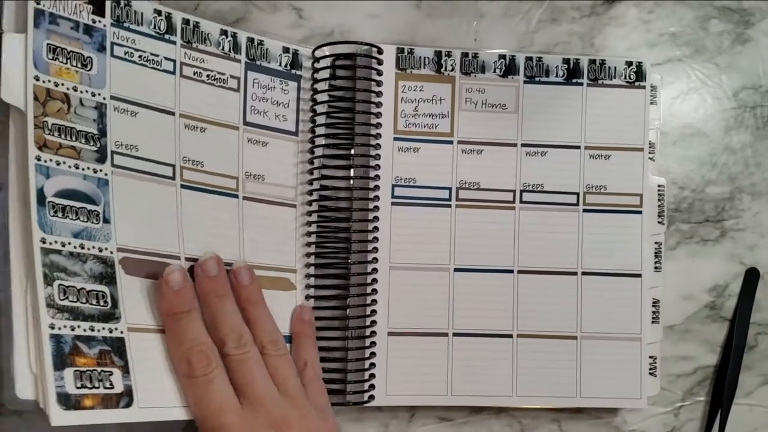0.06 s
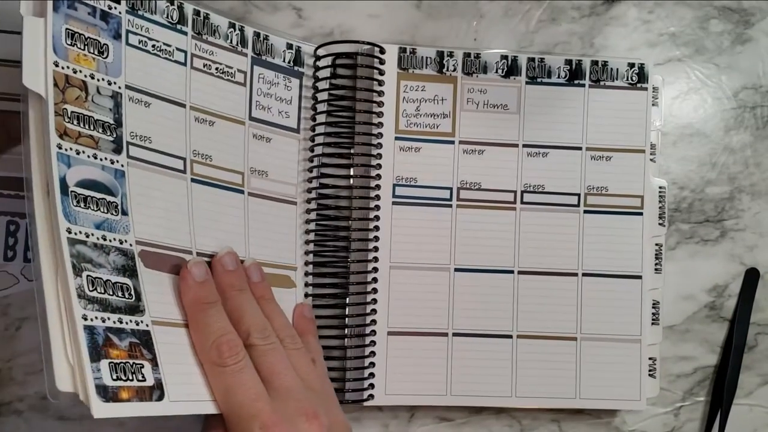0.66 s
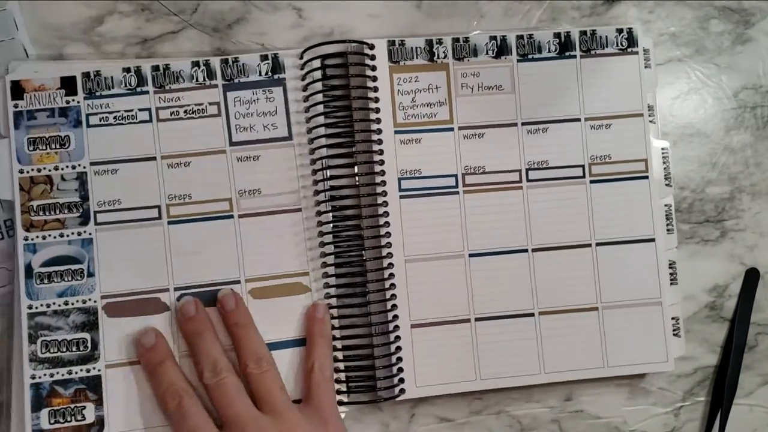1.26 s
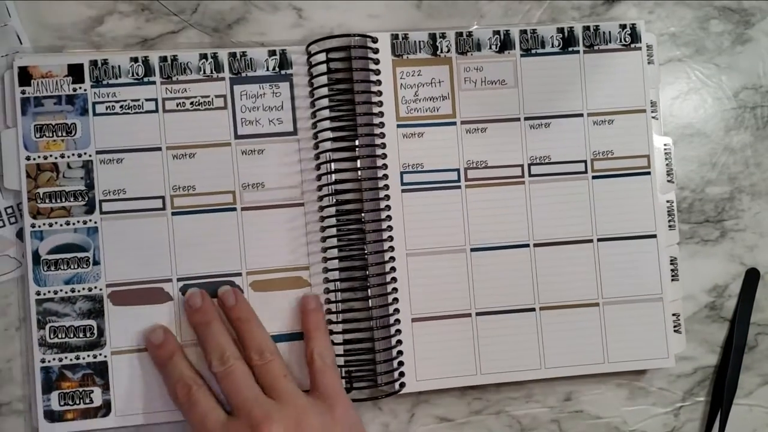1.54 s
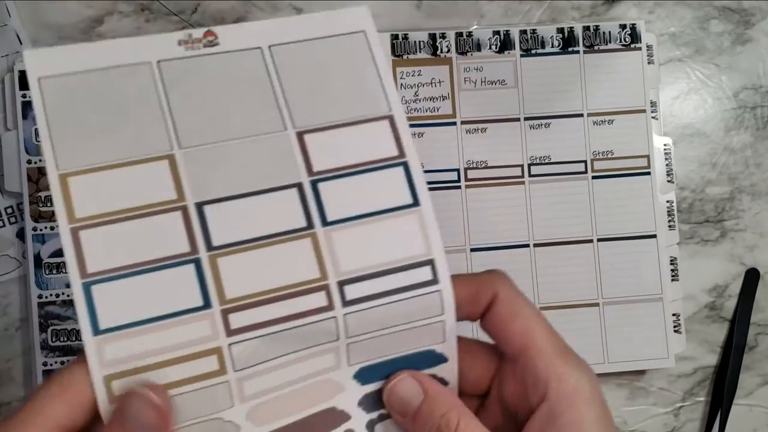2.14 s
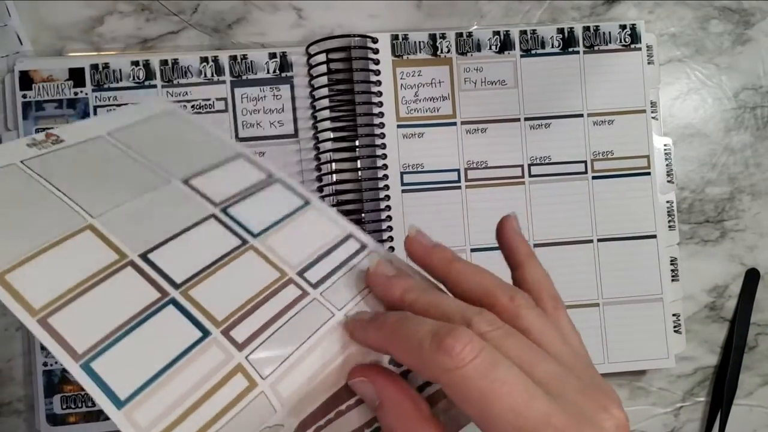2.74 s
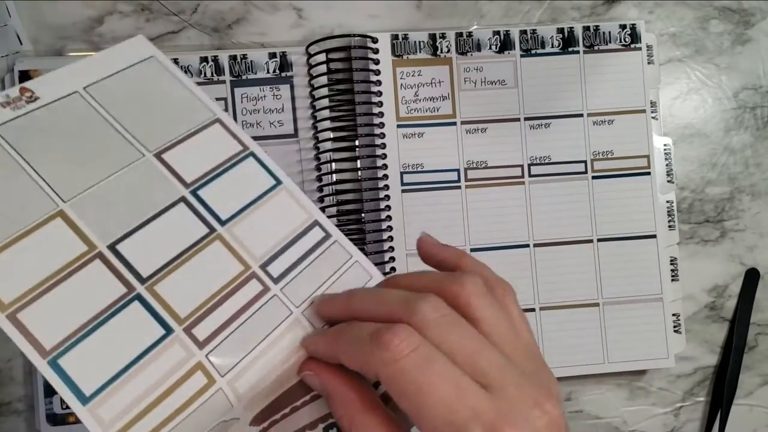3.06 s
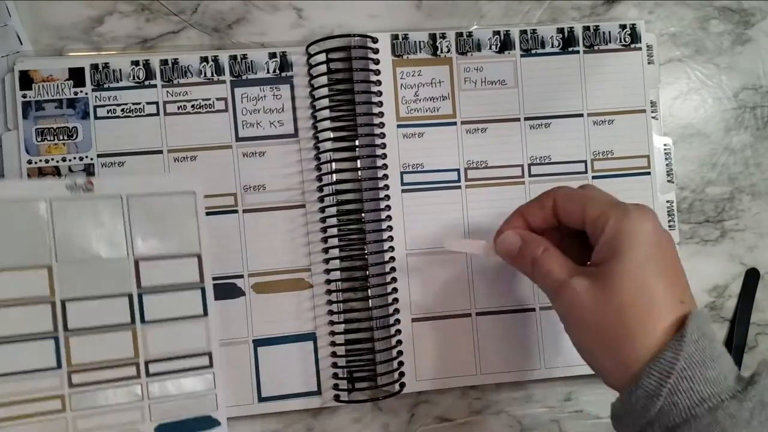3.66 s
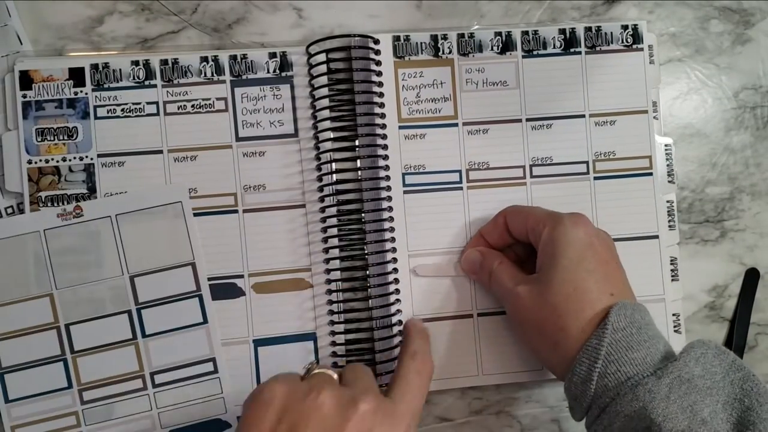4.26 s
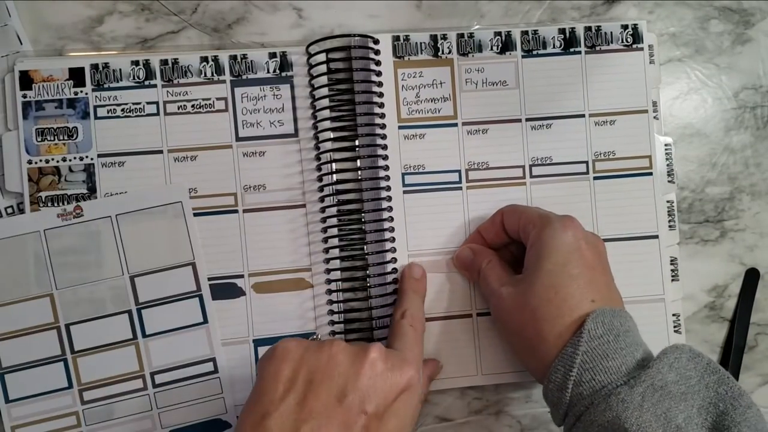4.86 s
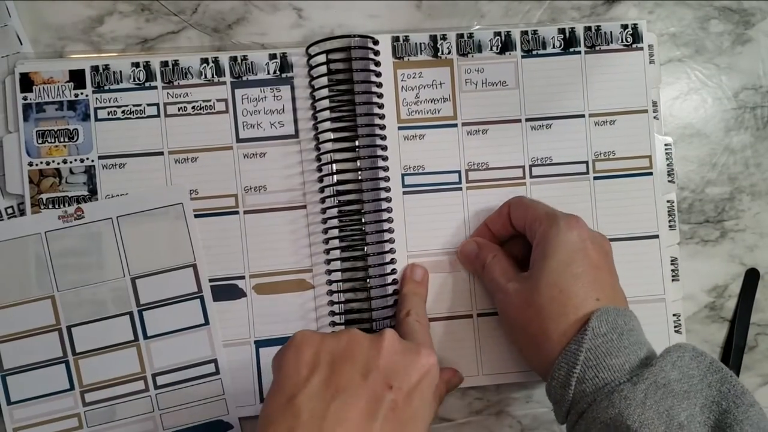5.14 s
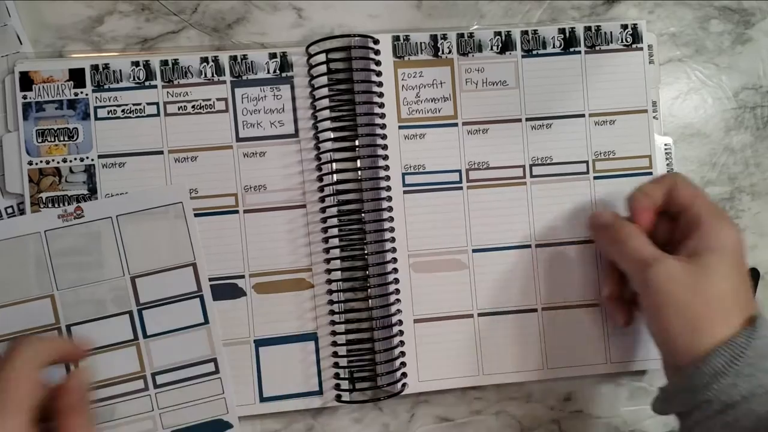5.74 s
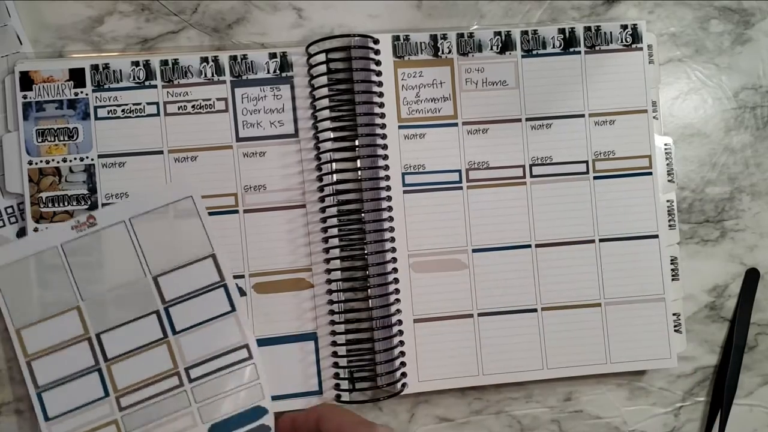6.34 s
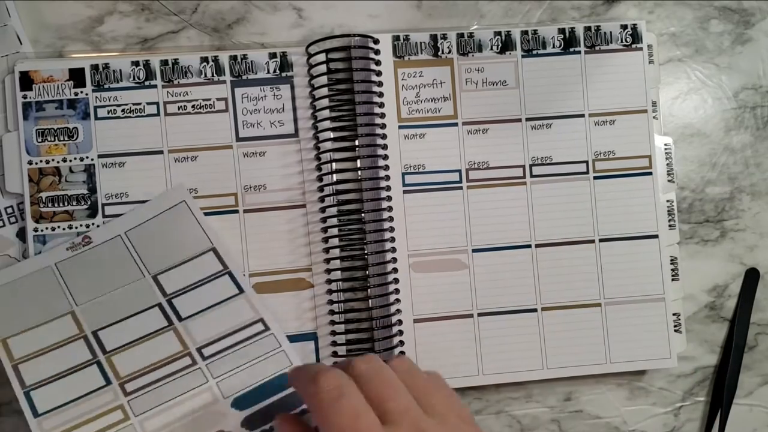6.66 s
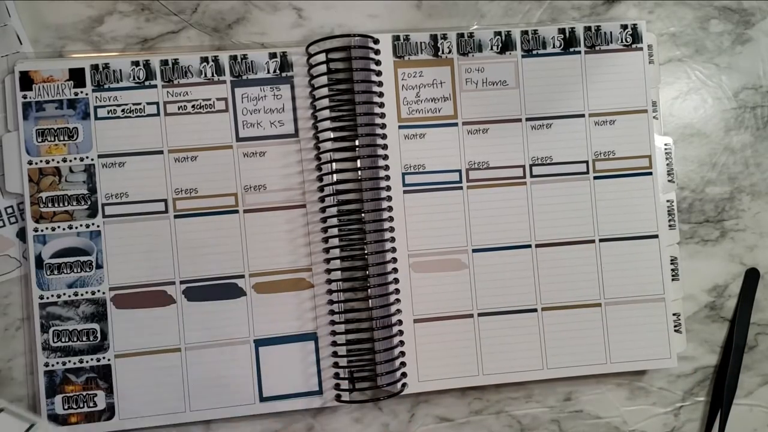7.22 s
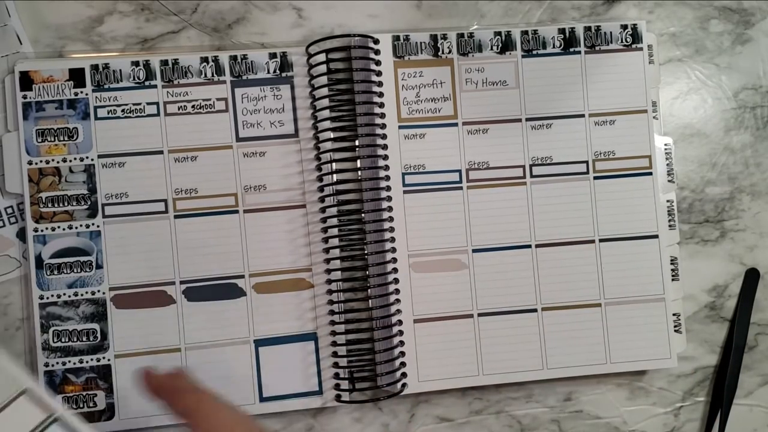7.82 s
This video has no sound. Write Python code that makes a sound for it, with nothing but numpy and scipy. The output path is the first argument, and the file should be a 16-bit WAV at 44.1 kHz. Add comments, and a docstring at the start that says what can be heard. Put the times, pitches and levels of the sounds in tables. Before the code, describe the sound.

A hand smooths a page and handles a sticker sheet, with light knocks, dry peeling crackles and a steady hum.

```python
"""Sticker sheets over a planner

A hand smooths a page and lets it flop; a sheet is lifted and knocked against the book, a sticker is
peeled off and placed, and the sheet slides away. Paper hisses in tiny slips, creases snap, glue crackles,
book and desk ring. A fan drones in the small room. The left microphone port faces the paper, the right
is shaded."""
import sys
import numpy as np
from scipy import signal
from scipy.fft import rfft, irfft, next_fast_len
from scipy.io import wavfile
from scipy.ndimage import map_coordinates

SR = 44100
rng = np.random.default_rng(int(sys.argv[2]) if len(sys.argv) > 2 else 0)


def store_wav(level_fs):
    """Save 16-bit WAV to argv[1]."""
    pcm = np.round(np.clip(np.atleast_2d(level_fs), -1, 1) * 32767)
    wavfile.write(sys.argv[1], SR, pcm.T.astype(np.int16))


N = 352359
TOP_HZ = 15780


def amp(db):
    """Decibels to gain."""
    return 10 ** (np.asarray(db) / 20)


def unit(x):
    """x at rms 1."""
    return x / np.sqrt(np.mean(x ** 2) + 1e-20)


def at_peak(x, db):
    """x scaled to a peak level."""
    return amp(db) * x / np.abs(x).max()


def along(points, hz):
    """(freq_hz, value) points read on a log axis."""
    freqs, values = np.transpose(points)
    return np.interp(np.log(hz + 1), np.log(freqs + 1), values)


def humps(peaks, hz):
    """Summed gain of (centre_hz, width_hz, level_db) resonances."""
    return sum(amp(db) / (1 + ((hz - centre) / (width / 2)) ** 2) for centre, width, db in peaks)


def wobble(rate_hz):
    """Smooth random curve."""
    knots = rng.standard_normal(int(N * rate_hz / SR) + 4)
    return map_coordinates(knots, [np.arange(N) * rate_hz / SR])


def filtered(x, response):
    """x through a gain that depends on frequency."""
    n = x.shape[-1]
    size = next_fast_len(n + 8192)
    return irfft(rfft(x, size) * response(np.fft.rfftfreq(size, 1 / SR)), size)[..., :n]


def coloured(x, spectrum):
    """x shaped by (freq_hz, level_db) points, rms 1."""
    return unit(filtered(x, lambda hz: amp(along(spectrum, hz))))


def ports(pan_db):
    """Constant-power gains for a left-minus-right level."""
    pair = np.array([amp(pan_db / 2), amp(-pan_db / 2)])
    return pair / np.sqrt(np.mean(pair ** 2, axis=0))


def add(track, start_s, sound):
    """Mix a sound into the track."""
    part = track[..., max(round(start_s * SR), 0):][..., :sound.shape[-1]]
    part += sound[..., :part.shape[-1]]


def noise_burst(t, t60_s):
    """Decaying white noise."""
    return rng.standard_normal(len(t)) * amp(-60 * t / t60_s)


def ring(modes, attack_s):
    """Damped modes, pitch and strength varied a little per blow, peak 1."""
    t = np.arange(SR // 2) / SR
    struck = [(hz * rng.normal(1, .015), db + rng.normal(0, 1.5), t60) for hz, db, t60 in modes]
    tone = sum(amp(db - 60 * t / t60) * np.sin(2 * np.pi * hz * t) for hz, db, t60 in struck)
    return at_peak(tone * (1 - np.exp(-t / attack_s)), 0)


def grains(rate_hz, spread_db):
    """Fibres catch and slip: tiny impulses of very unequal size, rms 1."""
    size = amp(spread_db * np.clip(rng.standard_normal(N), -3, 2.5))
    return unit((rng.random(N) < rate_hz / SR) * size * rng.choice([-1, 1], N))


def motion(strokes, drop_db=19, roundness=1.36):
    """Strokes swell and fade: gain per sample and a power-weighted (time_s, resonance_hz) curve."""
    t = np.arange(0, N, 64) / SR
    peak_s, db, rise_s, fall_s, hz = np.transpose(strokes)[:, :, None]
    away = np.abs(t - peak_s) / np.where(t < peak_s, rise_s, fall_s)
    power = amp(db - drop_db * away ** roundness) ** 2 + 1e-20
    gain = np.interp(np.arange(N) / SR, t, np.sqrt(power.sum(axis=0)))
    resonance_hz = (power * hz).sum(axis=0) / power.sum(axis=0)
    return gain, np.column_stack([t, resonance_hz])


def swept(x, curve, boost_db, half_width_oct):
    """x through a resonance following a (time_s, resonance_hz) curve, at constant power."""
    hz, t, spectra = signal.stft(x, SR, nperseg=512)
    distance_oct = np.log2((hz[:, None] + 1) / np.interp(t, *np.transpose(curve)))
    gain = amp(boost_db * np.exp(-(distance_oct / half_width_oct) ** 2))
    power = np.mean(np.abs(spectra) ** 2, axis=1, keepdims=True)
    gain /= np.sqrt(np.sum(power * gain ** 2, axis=0))
    return unit(signal.istft(spectra * gain, SR, nperseg=512)[1][:N])


# room decay: freq_hz, t60_s
ROOM_DECAY = [(150, 1), (1000, 0.29), (4000, 0.21), (15000, 0.094)]


def in_room(x, near_db, walls_db, tail_db, near_t60_s=0.0064, walls_t60_s=0.11, gap_s=.006):
    """Direct sound, scatter off the desk, then close walls and the room's tail, at two ports."""
    hz, t, spectra = signal.stft(rng.standard_normal((2, SR // 4)), SR, nperseg=256)
    decay = amp(-60 * t / along(ROOM_DECAY, hz)[:, None])
    tail = signal.istft(spectra * decay, SR, nperseg=256)[1]
    t = np.arange(tail.shape[1]) / SR
    near = rng.standard_normal(tail.shape) * amp(-60 * t / near_t60_s)
    walls = rng.standard_normal(tail.shape) * amp(-60 * t / walls_t60_s) * (t > gap_s)
    parts = (near, near_db), (walls, walls_db), (tail * (t > gap_s), tail_db)
    response = sum(amp(db) * part / np.linalg.norm(part[0]) for part, db in parts)
    response[[0, 1], [0, 8]] += 1  # direct path: left leads by 8 samples
    return signal.fftconvolve(x[None], response / np.linalg.norm(response[0]), axes=1)


def close_by(x):
    """Reflections of a sharp sound just under the microphone."""
    return in_room(x, near_db=-6, walls_db=-1, tail_db=-4, near_t60_s=.016, walls_t60_s=.08, gap_s=.002)


def wandering(x, size=8192, smoothing=.7):
    """A moving sheet meets ever new reflections; its width smooths most of their ripple."""
    hop = size // 2
    out, padded = np.zeros((2, N + size + hop)), np.pad(x, size)
    fade = np.sqrt(np.hanning(size))
    for start in range(0, N + size, hop):
        echoes = in_room(np.ones(1), near_db=-12, walls_db=3, tail_db=-1, walls_t60_s=.07, gap_s=.001)
        room = rfft(echoes, 3 * size)
        stretch = rfft(np.pad(padded[start:start + size] * fade, (hop, size + hop)))
        add(out, start / SR, irfft(stretch * room / np.abs(room) ** smoothing))
    return out[:, size + hop:]


# duct resonances: centre_hz, width_hz, level_db
DUCT_PEAKS = [(355, 27, 1), (423.2, 94, -3), (630, 15, -17.5)]
# rushing air: freq_hz, level_db
RUSH_SPECTRUM = [(25, -14), (75, -0.5), (130, -2.5), (220, -6.5), (350, -1.5), (600, -5), (900, -15.5),
                 (1500, -18), (4000, -27.5), (6700, -28.5), (8300, -35), (11000, -26.5), (15500, -18)]
# whine: pitch_hz, level_db
WHINE_TONES = [(1082, -90), (1203, -85.5)]
# fan at the ports: freq_hz, pan_db
FAN_PAN = [(70, -12), (150, -2.5), (250, -5), (360, 13), (700, 8), (1500, 6.5), (4000, 2.5), (7000, 10),
           (9000, 0), (15000, 3)]


def fan():
    """Air drones in a duct, over a soft rush and a thin whine."""
    t = np.arange(N) / SR
    air = rng.standard_normal(N) + 0.54 * rng.standard_normal((2, N))
    drone = unit(filtered(air, lambda hz: humps(DUCT_PEAKS, hz)))
    rush = coloured(0.48 * rng.standard_normal(N) + rng.standard_normal((2, N)), RUSH_SPECTRUM)
    whine = sum(amp(db) * np.sqrt(2) * np.sin(2 * np.pi * hz * t + 0.24 * wobble(9.1))
                for hz, db in WHINE_TONES)
    return filtered(amp(-52) * drone + amp(-58) * rush + whine, lambda hz: ports(along(FAN_PAN, hz)))


# paper sliding on paper and skin: peak_s, level_db, rise_s, fall_s, flap_hz
SLIDE_STROKES = [ (0.07, -44.5, 0.38, 0.15, 9100), (0.245, -49, 0.099, 0.054, 7600),
                 (0.35, -49.5, 0.11, .08, 6000), (0.44, -39.5, 0.05, 0.033, 5700),
                 (0.5, -47, 0.083, 0.059, 5170), (0.705, -45.5, 0.027, 0.023, 5960),
                 (0.762, -50.5, 0.024, 0.016, 6150), (0.87, -41.5, 0.081, 0.12, 6070),
                 (0.992, -37.5, 0.085, 0.081, 3800), (1.04, -35.5, 0.056, 0.023, 4500),
                 (1.2, -61.5, 0.1, 0.99, 5430), (1.348, -36, 0.017, 0.025, 6450),
                 (1.47, -47.5, 0.2, 0.16, 5740), (1.61, -53, 0.038, 0.069, 5600),
                 (1.8, -57, 0.26, 0.13, 6560), (2.15, -51.5, 0.096, .09, 7550),
                 (2.28, -40, 0.14, 0.13, 10700), (2.41, -38, 0.12, 0.079, 6100),
                 (2.6, -45.5, 0.42, 0.14, 5600), (2.825, -47, 0.033, 0.045, 6000),
                 (2.875, -47.5, 0.13, 0.073, 5370), (2.965, -48, 0.018, 0.021, 7000),
                 (3.07, -47.5, 0.047, 0.032, 5890), (3.215, -42, 0.11, 0.13, 6100),
                 (3.405, -45, 0.14, 0.11, 11000), (3.66, -50.5, 0.096, 0.063, 6360),
                 (3.78, -52, 0.048, 0.093, 6460), (3.89, -54, 0.17, 0.11, 5900),
                 (4.28, -64, 0.27, 0.2, 6500), (5.78, -63.5, 0.14, 0.18, 7000),
                 (6.12, -65, 0.09, .08, 7040), (6.205, -45, 0.031, 0.27, 5500),
                 (6.3, -47, 0.086, 0.12, 6360), (6.42, -43.5, 0.048, 0.04, 6460),
                 (6.53, -49.5, 0.11, 0.21, 10000), (6.65, -51, 0.2, 0.047, 8500),
                 (6.755, -46.5, 0.086, 0.12, 7900), (6.935, -51, 0.048, 0.026, 8000),
                 (7.03, -51.5, 0.055, 0.057, 8960), (7.2, -54, .035, 0.092, 9000),
                 (7.42, -57.5, 0.11, 0.07, 7950), (7.508, -45.5, 0.034, 0.016, 8500),
                 (7.65, -50, 0.04, 0.012, 11000), (7.72, -53, 0.069, 0.043, 9000),
                 (7.845, -43, 0.11, 0.086, 11100), (7.93, -49, 0.019, 0.05, 7140)]
# paper hiss: freq_hz, level_db
HISS_SPECTRUM = [(60, -120), (300, -9.5), (1000, -22), (2000, -10), (2600, -5.5), (2900, 0.5), (3250, -4.5),
                 (3700, -4.5), (4350, 0), (5600, 2.5), (7200, 4), (8400, -2.5), (9800, 3), (13000, 2.5),
                 (16000, 2.5)]
# desk reflection as the sheet moves: time_s, lag_ms
ECHO_LAG = [(0.3, 0.72), (0.9, 0.78), (2.3, 0.44), (2.8, 0.64), (3.3, 0.73), (6.25, 0.665), (6.7, 0.3),
            (7.8, 0.49)]


def sliding(pressure_waver_db=1.3):
    """Fine slips hiss, combed by the desk's reflection and coloured by the sheet's free flap."""
    gain, flap = motion(SLIDE_STROKES)
    slips = unit(grains(rate_hz=10000, spread_db=5.5) + 0.25 * grains(rate_hz=260, spread_db=10))
    hiss = coloured(slips, HISS_SPECTRUM)
    n = np.arange(N)
    lag_samples = np.interp(n / SR, *np.transpose(ECHO_LAG)) * SR / 1000
    combed = unit(hiss + .33 * map_coordinates(hiss, [n - lag_samples]))
    pressure = amp(pressure_waver_db * wobble(45))
    return swept(combed, flap, boost_db=2.74, half_width_oct=0.64) * gain * pressure


# sheet bending and dragging: peak_s, level_db, rise_s, fall_s, pocket_hz
FLEX_STROKES = [(0.03, -56, 0.19, 0.19, 2100), (0.14, -50, 0.08, 0.09, 2010),
                (0.25, -50.5, 0.07, 0.043, 1970), (0.36, -51.5, 0.055, 0.055, 1720),
                (0.435, -46, 0.042, 0.029, 2170), (0.44, -58, 0.24, 0.2, 560),
                (0.51, -61, 0.042, 0.11, 1810), (0.71, -56, 0.12, 0.075, 2220),
                (0.895, -42, 0.087, 0.034, 2220), (0.94, -35.5, 0.014, 0.044, 1410),
                (0.995, -29.5, 0.065, 0.067, 1350), (1.045, -35.5, .03, 0.022, 1370),
                (1.11, -51.5, 0.068, 0.11, 1020), (1.356, -41.5, 0.011, 0.076, 2030),
                (1.47, -54, 0.035, 0.12, 1390), (1.62, -56.5, 0.053, 0.048, 2220),
                (2.22, -55.5, 0.31, 1, 1130), (2.395, -37.5, 0.04, 0.076, 1290),
                (2.615, -40, 0.049, 0.021, 1340), (2.69, -42, 0.013, 0.094, 1260),
                (2.85, -53, .1, 0.079, 1080), (3.275, -55.5, 0.028, 0.064, 2940),
                (3.435, -45.5, 0.014, 0.065, 1350), (3.63, -52.5, 0.21, 0.057, 850),
                (3.8, -62.5, 0.13, 0.2, 1050), (3.92, -57.5, 0.053, 0.05, 1720),
                (5.67, -58.5, 0.14, 0.12, 620), (6.27, -60.5, 0.19, 0.31, 1360),
                (6.68, -52, 0.17, 0.22, 900), (6.96, -51.5, 0.071, 0.073, 1020),
                (7.24, -62.5, 0.1, 0.1, 700), (7.83, -51.5, 0.066, 0.096, 1110)]
# open book's resonances: centre_hz, width_hz, level_db
PAGE_PEAKS = [(646, 25, -3), (1045, 30, 0), (1222, 35, 0), (1346, 25, -2), (1542, 14, 3), (2283, 16, -2),
              (2603, 14, -2)]
# paper body: freq_hz, level_db
BODY_SPECTRUM = [(40, -70), (130, -52), (300, -22), (480, 11), (650, 4), (790, -1), (1050, -4), (1250, -7),
                 (1800, -3.5), (2600, 2), (3500, 2.5), (4500, -2), (6000, -1.5), (12000, -9)]


def flexing(pressure_waver_db=1.7):
    """Coarse slips of a bending sheet sound the book and the air pocket under the sheet."""
    gain, pocket = motion(FLEX_STROKES)
    slips = grains(rate_hz=4000, spread_db=5)
    body = coloured(filtered(slips, lambda hz: 1 + humps(PAGE_PEAKS, hz)), BODY_SPECTRUM)
    pressure = amp(pressure_waver_db * wobble(55))
    return swept(body, pocket, boost_db=17.6, half_width_oct=0.95) * gain * pressure


# creases: start_s, level_db, pan_db, t60_s, tilt_db_per_oct
CREASE_SNAPS = [(0.121, -36.5, 18, 0.065, -4.5), (0.158, -50, 12, .012, -12), (0.2333, -28.5, 9, 0.055, 5),
                (0.609, -34.5, 5.5, 0.028, -11), (0.688, -36, 23, 0.077, 8), (0.807, -34.5, 11, 0.092, 2),
                (.927, -24, -11, 0.011, -13.5), (0.976, -23, -8, 0.2, -6), (1.038, -15, -5, 0.0043, -6),
                (1.1448, -35.5, 2, 0.0051, -13), (1.3429, -22.5, -6, 0.043, -7.5),
                (1.4465, -25.5, -1.5, 0.064, -11.5), (1.575, -32.5, 1, .008, -9.5),
                (2.379, -22.5, -2, 0.042, -5.5), (2.4393, -23.5, -1, 0.017, -5.5),
                (2.537, -26.5, 2, 0.013, -8.5), (2.577, -30, 0.5, 0.03, -2), (2.6182, -26, 0, 0.027, -15),
                (3.257, -25.5, 0, 0.012, -3.5), (3.4248, -20.5, -12.5, 0.04, -2),
                (3.619, -37.5, 2, 0.01, -19), (4.043, -40, 8, 0.0084, -14.5), (6.083, -46, 9, 0.013, -16),
                (6.182, -32.5, -26, 0.071, -4), (7.7943, -35, -4, 0.051, -6.5)]


def snaps(rise_share=.07):
    """A crease in stiff paper gives way in a short, ragged burst."""
    out, t = np.zeros((2, N)), np.arange(SR // 8) / SR
    for start_s, db, pan_db, t60_s, tilt in CREASE_SNAPS:
        def colour(hz):
            tilt_db = tilt * np.log2(np.clip(hz, 1000, TOP_HZ))
            return amp(along(HISS_SPECTRUM, hz) + tilt_db) * (hz < TOP_HZ)

        burst = noise_burst(t, t60_s) * (1 - np.exp(-t / (rise_share * t60_s)))
        snap = filtered(np.pad(burst, (16, 0)), colour)
        add(out, start_s, ports(pan_db)[:, None] * close_by(at_peak(snap, db)))
    return out


# hands leaning on the desk: start_s, level_db
DESK_PUSHES = [(.475, -44), (2.632, -42), (2.707, -35.5), (2.86, -43), (3.178, -49.5), (5.64, -42.5),
               (5.798, -44), (6.443, -47)]
# microphone stand: pitch_hz, level_db, t60_s
STAND_MODES = [(47.3, -8, 0.28), (65.8, 3, 0.14), (79, 3, 0.073), (119.6, -6.5, 0.16)]


def bumps(scatter_s=0.017):
    """Pushes on the desk shake the stand: low shudders, different at each port."""
    out = np.zeros((2, N))
    for start_s, db in DESK_PUSHES:
        for port, gain in zip(out, ports(9.5)):
            onset_s = start_s + scatter_s * rng.random()
            add(port, onset_s, gain * amp(db) * ring(STAND_MODES, attack_s=0.026))
    return out


# sheet's edge: peak_s, level_db, rise_s, fall_s, centre_hz, width_hz
EDGE_SCRAPES = [(0.862, -47.5, 0.026, 0.12, 1300, 400), (0.88, -44.5, 0.091, 0.033, 7450, 1300),
                (0.985, -36.5, 0.033, 0.05, 4740, 800), (0.99, -39, 0.078, 0.056, 1370, 650),
                (2.8, -65, 0.81, 0.56, 2850, 260), (3.205, -53, 0.056, 0.099, 4300, 700),
                (5.665, -52.5, 0.1, 0.1, 13300, 5000), (6.21, -51, 0.027, 0.14, 4240, 900),
                (6.97, -56.5, 0.065, 0.15, 1120, 260), (7.84, -60.5, 0.07, 0.09, 1880, 500)]


def scrapes():
    """An edge catches in quick slips that ring one resonance of the sheet."""
    slips, out = grains(rate_hz=2300, spread_db=6), np.zeros(N)
    for peak_s, db, rise_s, fall_s, centre_hz, width_hz in EDGE_SCRAPES:
        gain, _ = motion([(peak_s, db, rise_s, fall_s, centre_hz)])
        out += gain * unit(filtered(slips, lambda hz: humps([(centre_hz, width_hz, 0)], hz)))
    return out


# blows on the book: start_s, book_db, desk_db, pan_db
BOOK_KNOCKS = [(.927, -13.5, -60, -40), (0.991, -23, -56, -29),  (1.448, -43, -26, -30),
               (2.382, -17, -43, -11.5), (2.6187, -23, -60, 6), (2.6767, -3, -62, -13),
               (2.684, -17.5, -55, 5), (3.430, -21, -60, -17), (3.618, -43, -69, -6),
               (4.0427, -43.5, -66, -6), (6.0843, -44, -55, -8), (6.182, -38, -33, -29)]
# cover and pages: pitch_hz, level_db, t60_s
BOOK_MODES = [(354, -25, 0.59), (420.6, -13, 0.1), (730, -14, 0.027), (1040, -12.5, 0.042),
              (1310, 6, 0.011), (1407, -18, 0.051), (1830, -9, 0.014), (2190, -0.5, 0.0074),
              (2600, -29, 0.0098)]
# desk: pitch_hz, level_db, t60_s
DESK_MODES = [(150, -1.5, 0.1), (186.5, 2.5, 0.085), (225, -4.5, 0.08), (331, -6, 0.064)]


def knocks():
    """Sheet edge and hand slap the damped book; the desk thuds and the walls answer."""
    out, t = np.zeros((2, N)), np.arange(SR // 2) / SR
    for start_s, book_db, desk_db, pan_db in BOOK_KNOCKS:
        slap = coloured(rng.standard_normal(len(t)), BODY_SPECTRUM) * amp(-60 * t / 0.018)
        book = amp(book_db) * (ring(BOOK_MODES, attack_s=.0001) + 0.085 * slap)
        thud = amp(desk_db) * ring(DESK_MODES, attack_s=0.026)
        knock = in_room(book + thud, near_db=-34, walls_db=-1.5, tail_db=-13.5)
        add(out, start_s, ports(pan_db)[:, None] * knock)
    return out


# wire loop: start_s, level_db, pitch_hz, t60_s
WIRE_PING = (1.341, -36, 5480, .03)


def binding():
    """The page's holes catch on the wire binding; one loop rings."""
    out = np.zeros((2, N))
    start_s, db, hz, t60_s = WIRE_PING
    add(out, start_s, close_by(amp(db) * ring([(hz, 0, t60_s)], attack_s=.001)))
    return out


def glue_tick(spectrum, db, t60_s, tail_db):
    """One short, bright crack of glue with the room behind it."""
    t = np.arange(SR // 8) / SR
    crack = coloured(np.pad(noise_burst(t, t60_s), (16, 0)), spectrum)
    crack = filtered(crack, lambda hz: hz < TOP_HZ)
    return in_room(at_peak(crack, db), near_db=-14, walls_db=-9, tail_db=tail_db, gap_s=.002)


# glue giving way: start_s, level_db
PEEL_CRACKLES = [(3.2167, -23), (3.2265, -18.5), (3.2575, -21), (3.277, -28), (3.2995, -31), (3.3482, -35),
                 (3.378, -25), (3.3982, -30), (3.4235, -28), (3.4285, -23)]
# crackle: freq_hz, level_db
PEEL_SPECTRUM = [(1500, -13), (3000, -16), (6000, -4), (11000, 3)]


def peeling():
    """The sticker leaves its backing in a run of dry crackles."""
    out = np.zeros((2, N))
    for start_s, db in PEEL_CRACKLES:
        add(out, start_s, glue_tick(PEEL_SPECTRUM, db, t60_s=.005, tail_db=-12))
    return out


# glue leaving the fingertip: start_s, level_db, pan_db, t60_s
RELEASE_TICKS = [(5.2215, -14.5, 2, .009), (5.2283, -29, 2, .004)]
# tick: freq_hz, level_db
RELEASE_SPECTRUM = [(1000, -38), (4000, -38), (6000, -24), (8300, -22), (9800, -17), (11500, -15),
                    (13500, -3), (15600, 3)]
# freed end: start_s, level_db, t60_s
END_QUIVER = (5.246, -45, .075)
# its resonances: centre_hz, width_hz, level_db
END_PEAKS = [(2350, 350, -4), (2780, 400, 0), (5950, 600, -5), (7000, 1500, -11)]


def sticker_release():
    """Glue parts from the fingertip with a high tick; the sticker's freed end quivers."""
    out, t = np.zeros((2, N)), np.arange(SR // 8) / SR
    for start_s, db, pan_db, t60_s in RELEASE_TICKS:
        add(out, start_s, ports(pan_db)[:, None] * glue_tick(RELEASE_SPECTRUM, db, t60_s, tail_db=-9))
    start_s, db, t60_s = END_QUIVER
    quiver = filtered(noise_burst(t, t60_s), lambda hz: humps(END_PEAKS, hz))
    add(out, start_s, close_by(at_peak(quiver, db)))
    return out


# port shading, added to each paper and book event's pan: freq_hz, pan_db
PAPER_PAN = [(100, 28.5), (350, 6), (650, 11.5), (1200, 10.5), (2600, 20), (4400, 15), (6300, 23.5),
             (7600, 36), (8700, -2.5), (9600, 7), (11500, 3), (15500, 10.5)]


def scene():
    """Paper and book at the two ports, with the stand's shudders and the fan."""
    rubbing = wandering(sliding() + flexing() + scrapes())
    paper = rubbing + snaps() + peeling() + binding() + sticker_release() + knocks()
    shaded = filtered(paper, lambda hz: ports(along(PAPER_PAN, hz)))
    return shaded + bumps() + fan()


def record(dry):
    """The microphone passes nothing above its band limit."""
    return filtered(dry, lambda hz: hz < TOP_HZ)


dry = scene()
out = record(dry)
store_wav(out)
```